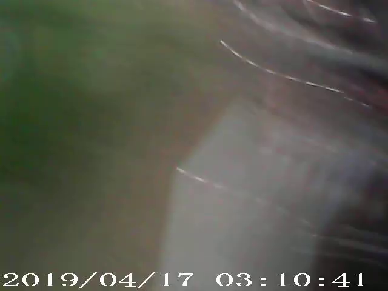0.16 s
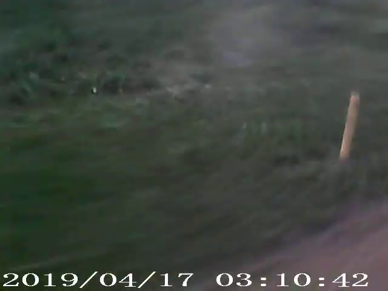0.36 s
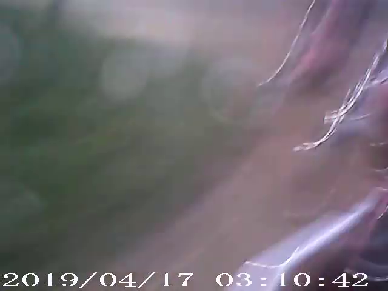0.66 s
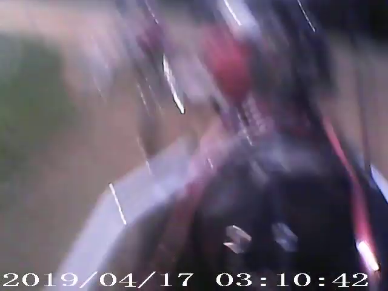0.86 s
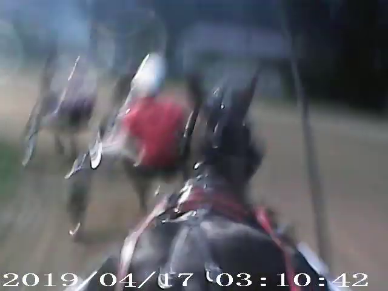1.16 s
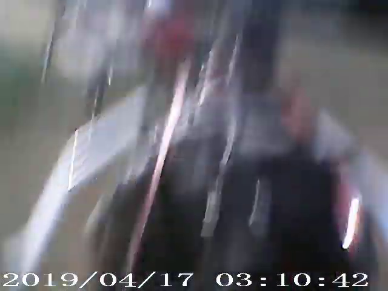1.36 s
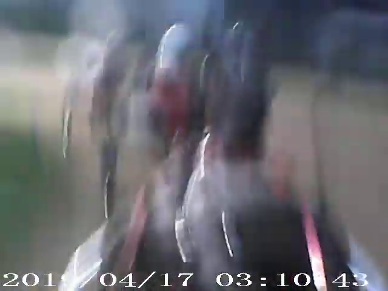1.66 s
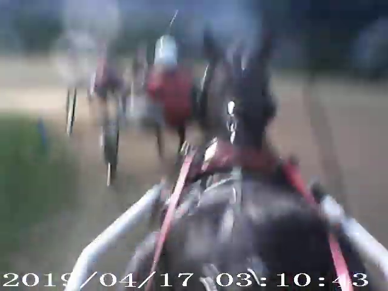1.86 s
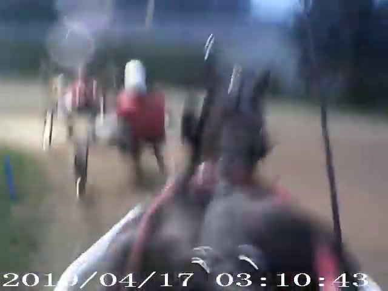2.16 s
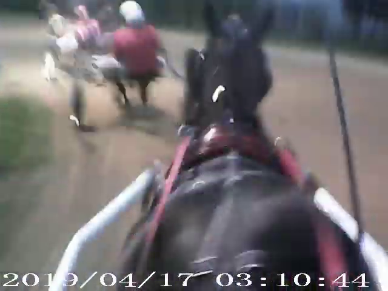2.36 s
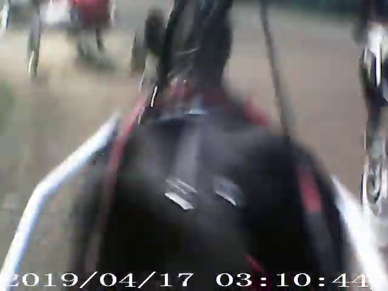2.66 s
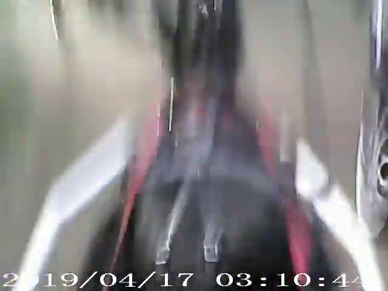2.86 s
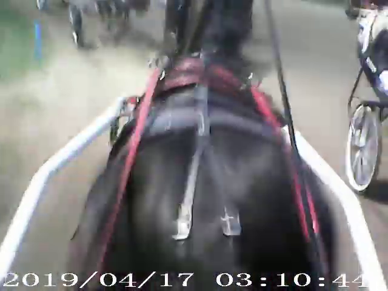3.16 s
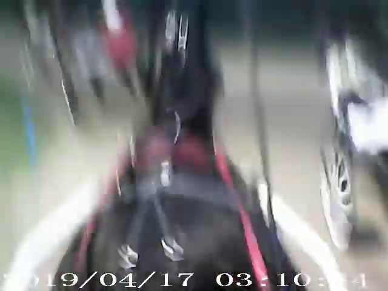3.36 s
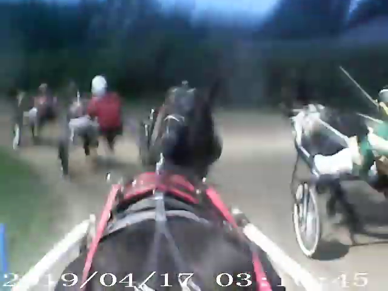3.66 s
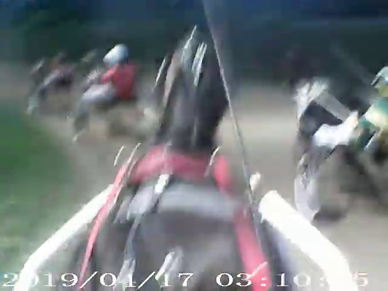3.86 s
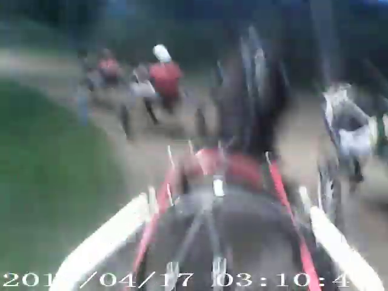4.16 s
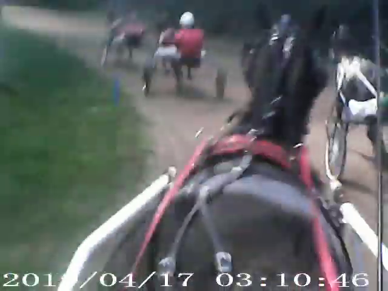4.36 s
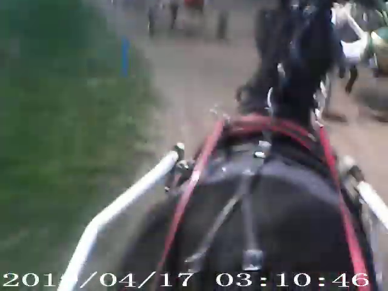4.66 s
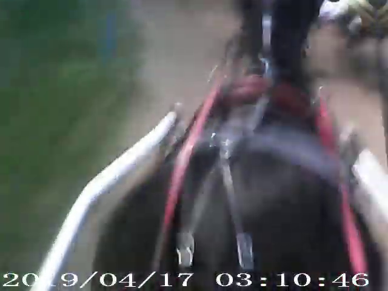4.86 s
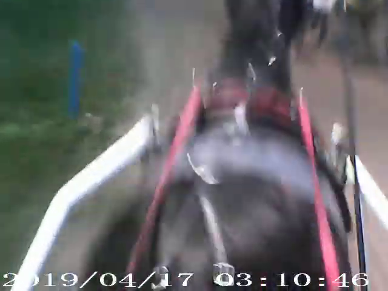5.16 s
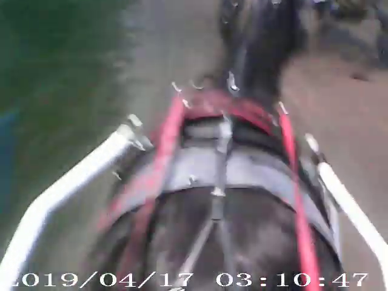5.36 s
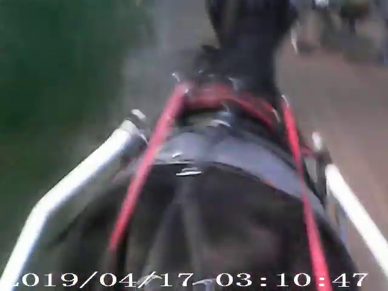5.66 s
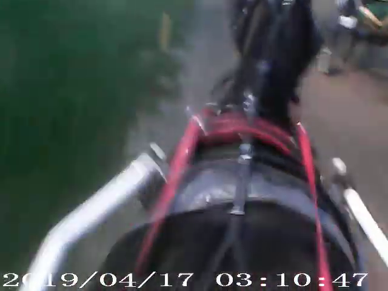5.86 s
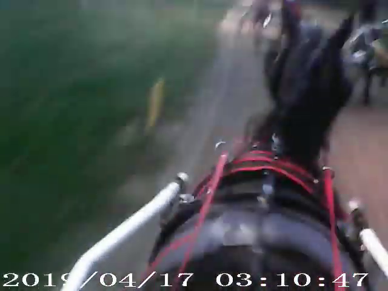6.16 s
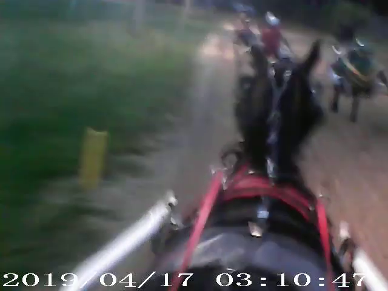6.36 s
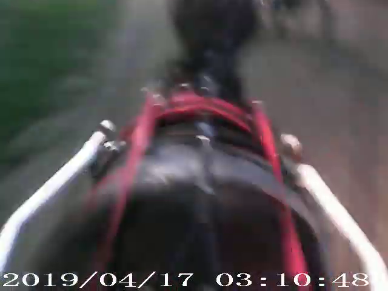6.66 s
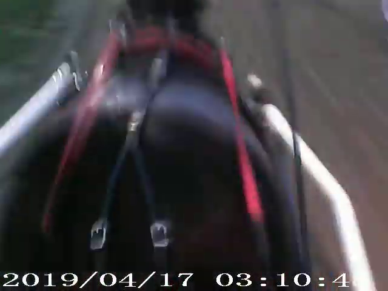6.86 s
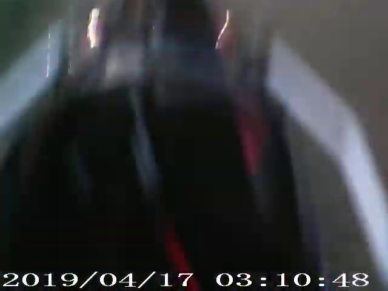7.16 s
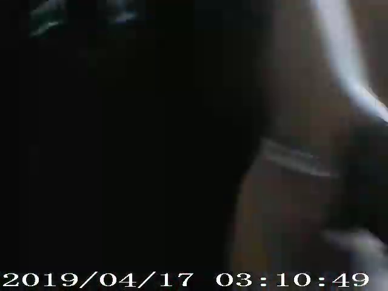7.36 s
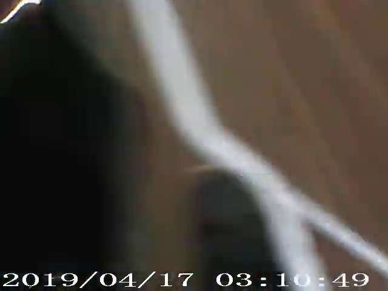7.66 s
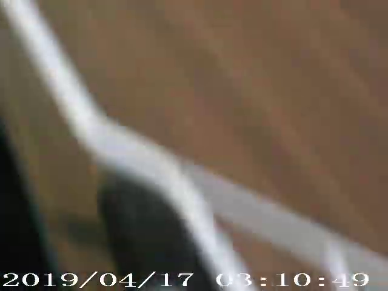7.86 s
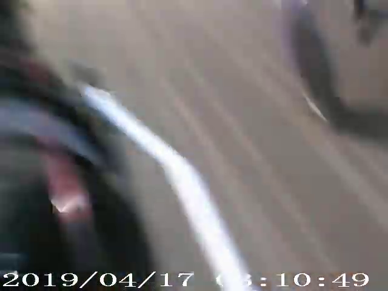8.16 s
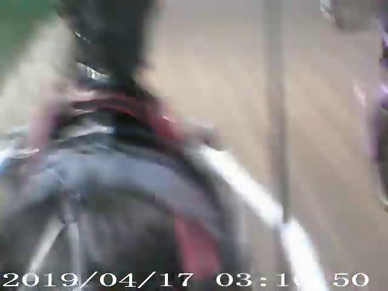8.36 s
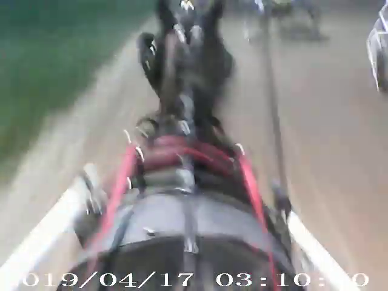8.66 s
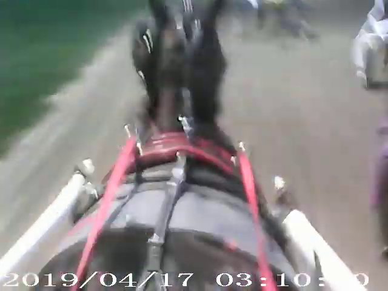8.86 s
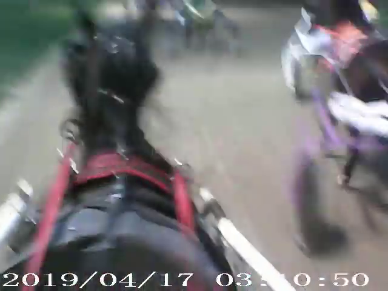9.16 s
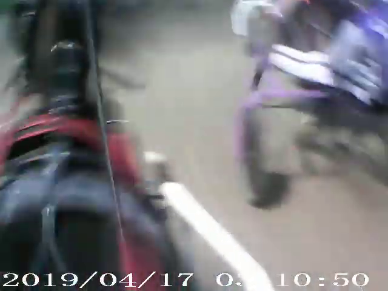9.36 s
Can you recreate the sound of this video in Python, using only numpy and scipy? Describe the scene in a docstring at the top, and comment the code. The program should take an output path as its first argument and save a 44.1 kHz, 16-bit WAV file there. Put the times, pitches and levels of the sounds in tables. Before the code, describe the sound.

Outdoors on a dirt track, a cart runs behind a horse. Heavy bumps and cracks of flying grit strike the microphone during the first two seconds, with a short metal clang almost immediately. Softer bumps cluster around three to five seconds, then mostly rolling sand, faint ticking and wind remain, broken by several late knocks. Mono, cheap, very close and without echo.

```python
"""Sulky on a dirt track

A sulky rolls fast behind a trotting horse, heard close up from a small camera that the driver wears.
The tyres hiss on crushed sand (shaped noise and grains); the headwind booms (resonant noise), and gusts
and jolts thump the microphone (short swings of pressure). Grit from the hooves raps on the housing (noise
bursts), loose fittings tick and the frame sings faintly. One stone rings a steel tube (decaying sines);
at a few moments the microphone chokes silent and snaps back with a spike."""
import sys
import numpy as np
from scipy import signal
from scipy.fft import rfft, irfft, next_fast_len
from scipy.io import wavfile
from scipy.ndimage import uniform_filter1d, map_coordinates

SR = 44100
rng = np.random.default_rng(int(sys.argv[2]) if len(sys.argv) > 2 else 0)


def log_audio(samples):
    """Write samples as a 16-bit WAV file to the path given in sys.argv[1]."""
    # one column per channel
    frames = np.atleast_2d(samples).T
    # limit to full scale, then quantise
    limited = np.clip(frames, -1, 1)
    pcm = np.round(limited * 32767).astype(np.int16)
    wavfile.write(sys.argv[1], SR, pcm)


N = 419832
TIME = np.arange(N) / SR  # seconds


def amp(db):
    """Decibels to gain."""
    return 10 ** (np.asarray(db) / 20)


def unit(x):
    """Scale to rms 1."""
    return x / np.sqrt(np.mean(x ** 2) + 1e-20)


def gain(points, hz):
    """Gain of (Hz, dB) points joined on a log frequency axis."""
    f, db = np.transpose(points)
    return amp(np.interp(np.log(hz + 1), np.log(f), db))


def curves(rows):
    """One value per sample for each column after the time."""
    s, *cols = np.transpose(rows)
    return [np.interp(TIME, s, c) for c in cols]


def wobble(rate):
    """A smooth random curve with rate knots a second."""
    knots = rng.standard_normal(2048)
    return map_coordinates(knots, [TIME * rate], mode="mirror")


def filtered(x, response):
    """Multiply the spectrum of x by a response of frequency."""
    size = next_fast_len(len(x) + len(x) // 10)
    f = np.fft.rfftfreq(size, 1 / SR)
    return irfft(rfft(x, size) * response(f), size)[:len(x)]


def add(track, s, sound):
    """Mix a sound into the track at time s."""
    start = max(round(s * SR), 0)
    track[start:start + len(sound)] += sound[:max(N - start, 0)]


def resonance(f, hz, width):
    """Causal response of one damped mode."""
    return 1j * f * width / (hz * hz - f * f + 1j * f * width)


def scattered(start, end, rate):
    """Uneven times in the span, about rate a second, falling freely within equal slots that overlap."""
    count = max(int(round((end - start) * rate)), 1)
    chance = rng.random(256)
    return start + (end - start) * (np.arange(count) + 2 * chance[:count]) / (count + 1)


# Headwind at the microphone. Each row: time in seconds, rumble level in dB.
WIND_RUMBLE = [(0, -45), (1.3, -37.5), (2.3, -47), (3.2, -53.5), (4.1, -42.5), (5.9, -48.5), (7.93, -45.5),
               (7.98, -39), (8.25, -44), (9.52, -44.5)]


def wind(hz=58, width_hz=40, sub_db=-9, sub_hz=30):
    """The headwind keeps up a lumpy boom around one low resonance, with a weaker one beneath it."""
    def response(f):
        main = np.abs(resonance(f, hz, width_hz)) ** 2
        sub = np.abs(resonance(f, sub_hz, sub_hz)) ** 2
        return main + amp(sub_db) * sub

    rumble_db, = curves(WIND_RUMBLE)
    boom = filtered(rng.standard_normal(N), response)
    lumps_db = 1.8 * wobble(12)
    return amp(rumble_db + lumps_db) * unit(boom)


# Spells in which the frame sings. Each row: middle in seconds, half length in seconds, level in dB.
SINGING_SPELLS = [(2.292, 0.25, -58.5), (5.8, 2.5, -63.5)]


def singing():
    """Vibration keeps one mode of the steel frame faintly singing, on and off."""
    mode = unit(filtered(rng.standard_normal(N), lambda f: resonance(f, 3323, 34)))
    spells = sum(amp(db) * np.exp(-((TIME - s) / length) ** 4) for s, length, db in SINGING_SPELLS)
    return amp(3.5 * wobble(14)) * spells * mode


def ticks(jolts, db=3, hz=2000):
    """Wherever the cart is being jolted, loose sand and harness fittings tick."""
    shaking = np.sqrt(np.abs(uniform_filter1d(jolts ** 2, size=SR // 16)))
    hits = rng.random(N) < 36 / SR  # about 36 a second
    contacts = hits * rng.uniform(-1, 1, N) * np.minimum(shaking, .05)
    t = np.arange(SR // 200) / SR
    scrape = rng.standard_normal(len(t)) * np.exp(-t / 0.00039)
    tapping = signal.fftconvolve(contacts, scrape)[:N]
    return amp(db) * filtered(tapping, lambda f: resonance(f, hz, 2 * hz))


# Air cavities right in front of the microphone. Each row: centre in Hz, width in Hz, lift or cut in dB.
HOUSING_CAVITIES = [(765, 98, 8.5), (1316, 300, 7), (1980, 370, 8), (3940, 120, 9), (4390, 260, 4.5),
                    (6400, 450, -3.5)]


def housing(f):
    """Each cavity in front of the microphone lifts or dips its own band."""
    bands = [1 + (amp(db) - 1) * resonance(f, hz, width) for hz, width, db in HOUSING_CAVITIES]
    return np.prod(bands, axis=0)


CRUMBS_PER_S, CRUMB_DB, CRUMB_HZ, CRUMB_S = 2, -28, 1200, .002  # rate, middle level and pitch, length


def crumbs(scatter_db=3):
    """Faint crumbs strike all along the way: rows like those of CLODS."""
    times = scattered(0, N / SR, CRUMBS_PER_S)
    chance = rng.uniform(-1, 1, (256, 2))
    return [(s, CRUMB_DB + scatter_db * force, CRUMB_HZ * 2 ** (pitch / 2), CRUMB_S)
            for s, (force, pitch) in zip(times, chance)]


# Clods that rap on the housing. Each row: start in seconds, level in dB, pitch in Hz, length in seconds.
CLODS = [(.033, 3.5, 2700, 0.003), (.04, 1, 1580, 0.0034), (.216, -6.5, 3820, 0.0038),
         (.3137, 0, 2140, 0.0043), (.4072, -5.5, 3800, 0.0062), (.451, -10.5, 3450, .0043),
         (.494, -9.5, 3750, 0.0021), (.51, -22, 3620, 0.0066), (.527, -3.5, 2360, 0.0038),
         (.752, -1.5, 3700, 0.00086), (1.039, -9, 3070, 0.0064), (1.101, -6.5, 3750, 0.0062),
         (1.1223, -4, 1150, 0.0066), (1.15, -7, 800, 0.0094), (1.371, -4, 2950, 0.0012),
         (2.119, -16, 1300, 0.0094), (2.544, -18.5, 1390, 0.0049), (2.964, -17, 1500, 0.0047),
         (3.027, -24, 3030, 0.0034), (3.144, -17, 1070, 0.0055), (3.738, -13, 1300, 0.00098),
         (3.957, -17.5, 1330, 0.011), (4.3965, -8, 4330, 0.003), (4.397, -16.5, 900, .012),
         (5.222, -16.5, 3150, 0.0088), (7.499, -6, 1550, 0.003), (7.739, -10.5, 1000, 0.0067),
         (7.744, -8, 3460, 0.0062), (7.9247, -12.5, 3670, 0.0031), (8.2735, -13, 3840, 0.0044),
         (8.646, -18, 2050, 0.0058)]
CLOD_WIDTH_HZ, CLOD_WIDENS = 5350, 0.85  # bandwidth of a low 0 dB rap; power of strength that widens it
SHELL_HZ, CLOD_SKIRT_DB = 3490, -7  # above this pitch the shell pings narrowly; broad crack in every rap


def grit(tail_db=-24, tail_t60=0.048, colour=0.81, briefness=0.7, usual_s=0.0049):
    """A clod bursts in milliseconds of micro-impacts, the harder and briefer the broader, with a tail."""
    out, t = np.zeros(N), np.arange(SR // 10) / SR
    for s, db, hz, length in list(CLODS) + crumbs():
        width = CLOD_WIDTH_HZ * amp(CLOD_WIDENS * db) * (usual_s / length) ** briefness
        width = width / np.hypot(1, (hz / SHELL_HZ) ** 4)
        burst = np.exp(-(t / length) ** 2)
        tail = amp(tail_db - 60 * t / tail_t60)
        spray = (1 - np.exp(-t / 0.00013)) * (burst + tail)

        def body(f):
            ping = resonance(f, hz, width)
            return ping * (ping + amp(CLOD_SKIRT_DB)) * housing(f) ** colour

        rap = filtered(spray * rng.standard_normal(len(t)), body)
        same_energy = np.linalg.norm(spray) / np.linalg.norm(rap)
        add(out, s, amp(db - 9.5) * rap * same_energy)
    return out


# Modes of the struck tube. Each row: pitch in Hz, relative level in dB, time to fall 60 dB in seconds.
TUBE_MODES = [(1494, -20, .3), (1620, 0, .08), (1902, -12, .6), (3259, -25, .3), (3322, -11, .1),
              (4400, -14, .08), (4480, -16, .1), (5798, -26, .22), (6400, -22, .26)]


def tube():
    """A stone rings a steel tube of the cart: its modes start together and die at their own rates."""
    out, t = np.zeros(N), np.arange(SR) / SR
    ring = sum(amp(level - 60 * t / t60) * np.sin(2 * np.pi * (hz * t + rng.random()))
               for hz, level, t60 in TUBE_MODES)
    onset = 1 - np.exp(-t / .001)
    add(out, .044, amp(-8) * ring * onset)
    return out


# Spells of buffeting air. Each row: start in seconds, end in seconds, typical level in dB.
BUFFETING_SPELLS = [(0.618, 0.877, -19), (1.099, 1.203, -15.5), (3.446, 4.248, -19), (4.727, 5.249, -24),
                    (6.296, 6.798, -22.5), (7.228, 7.37, -14.5)]
BUFFETS_PER_S, BUFFET_HZ, BUFFET_SCATTER_DB = 14, 159, 3.5  # rate, middle pitch, spread in strength


def buffets():
    """Lesser bumps come at random while the air buffets: rows like those of THUMPS."""
    times = [(s, db) for start, end, db in BUFFETING_SPELLS
             for s in scattered(start, end, BUFFETS_PER_S)]
    chance = rng.uniform(-1, 1, (256, 2))
    return [(s, db + BUFFET_SCATTER_DB * force, BUFFET_HZ * 2 ** (pitch / 2))
            for (s, db), (force, pitch) in zip(times, chance)]


# Gusts and jolts that thump the microphone. Each row: middle in seconds, level in dB, pitch in Hz.
THUMPS = [(.047, 2.5, 290), (.224, -12, 190), (.271, -10, 185), (.286, -3, 235), (.308, -2.5, 414),
          (.389, -7.5, 224), (.688, -13, 253), (.926, -9, 182), (1.154, -3.5, 365), (1.173, 0, 300),
          (1.352, -0.5, 192), (1.493, 1, 490), (1.606, -0.5, 196), (1.681, -11, 260), (1.769, -10.5, 130),
          (1.79, -7, 290), (2.559, -10.5, 165), (2.61, -11, 211), (2.976, -5.5, 255), (3.036, -7.5, 190),
          (3.053, -5, 280), (3.433, -14.5, 176.3), (3.478, -9, 244), (3.54, -13.5, 180),
          (3.606, -12.5, 203), (3.655, -11.5, 155), (3.728, -3.5, 222), (3.904, -5.5, 204),
          (4.088, -7.5, 204), (4.128, -8, 201), (4.192, -16, 145), (4.277, -10.5, 131), (4.803, -15.5, 178),
          (4.998, -11.5, 179), (5.112, -13, 126), (5.156, -13, 170), (5.378, -17, 197), (5.443, -12, 181),
          (5.535, -10.5, 182), (6.013, -19.5, 187), (6.193, -18, 227), (6.488, -21, 154),
          (7.176, -8.5, 223), (7.324, -17.5, 260), (7.5, -9.5, 463), (7.741, -16, 520), (8.617, -12.5, 188)]


def bumps(cycles=0.6, shortest=0.0025, push=0.55, push_width=1.035, bend=0.077,
          scuff_db=-21, scuff_hz=550, scuff_life=0.0052, eddy_db=-14, eddy_lag=0.01572):
    """A bump is a swing or two of pressure on a slower push, with scuffing and a weaker eddy close by."""
    out, t = np.zeros(N), np.arange(-SR // 20, SR // 20) / SR
    for s, db, hz in list(THUMPS) + buffets():
        phase, glide, side, lag = rng.uniform(-1, 1, 4)
        length = max(cycles / hz, shortest)  # high bumps swing several times and sound like knocks
        bluntness = cycles / hz / length
        u = t / length
        swell = 1 / np.cosh(np.clip(2.98 * u, -20, 20))
        bent_time = t * (1 + bend * glide * np.tanh(u))  # the pitch bends a little
        swing = np.sqrt(bluntness) * swell * np.cos(2 * np.pi * hz * bent_time + np.pi * phase)

        push_swell = np.exp(-(u / push_width) ** 2 / 2)
        slow = push * bluntness ** 2 * np.sin(np.pi * side + 1.57 * u / push_width) * push_swell

        rubbing = np.where(t < 0, swell, np.exp(-np.abs(t) / scuff_life))
        rasp = filtered(rng.standard_normal(len(t)),
                        lambda f: resonance(f, scuff_hz, 1.32 * scuff_hz) ** 2)
        scuff = rubbing * unit(rasp)

        add(out, s + t[0], amp(db) * (swing + slow + amp(scuff_db) * scuff))
        add(out, s + t[0] + eddy_lag * np.cbrt(lag), amp(db + eddy_db) * swing)  # before or after
    return out


def patchy(x, depth_db):
    """Let each band of x swell and sink by itself."""
    z = signal.stft(x, nperseg=512)[2]
    field = uniform_filter1d(rng.standard_normal(z.shape), size=7, axis=0)
    field = uniform_filter1d(field, size=9, axis=1)
    return signal.istft(z * amp(depth_db * unit(field)), nperseg=512)[1][:N]


def crunch(spectrum, rate, grain_db, patchy_db, spread_db=4):
    """A bed of countless tiny grains with rate larger ones a second on top, rms 1."""
    hits = (rng.random(N) < rate / SR) * rng.choice([-1, 1], N)
    grains = hits * amp(spread_db * np.minimum(rng.exponential(size=N), 2))
    bed = rng.standard_normal(N) + amp(grain_db) * unit(grains)
    return unit(filtered(patchy(bed, patchy_db), lambda f: gain(spectrum, f) * housing(f)))


# Spectra of the wheels' and hooves' drone, of the roll and of the sand's hiss, before the housing
# colours them. Each row: frequency in Hz, relative level in dB per Hz.
DRONE_SPECTRUM = [(25, -11.5), (110, 3.5), (220, 3), (500, 4), (800, -8.5), (1150, -19.5), (2200, -37.5)]
ROLL_SPECTRUM = [(200, -7.5), (900, -5), (1400, -4), (1800, -7.5), (2200, -6.5), (2700, -16.5), (4000, -37)]
HISS_SPECTRUM = [(1200, -22), (2300, -5.5), (3100, 2), (4100, -1), (5000, -5.5), (7000, -5), (8000, -25.5)]
# How hard the tyres crush the track. Each row: time in seconds, roll level in dB.
ROLL_LEVEL = [(0, -35.5), (.55, -42), (.98, -41), (1.06, -33.5), (1.7, -42), (2.8, -45), (3.6, -45.5),
              (3.85, -40.5), (4.35, -38), (4.52, -45.5), (5.05, -45.5), (5.2, -40.5), (5.62, -37),
              (5.8, -45.5), (7.7, -42.5), (7.8, -39), (8.2, -42.5), (9.52, -39)]
# The sand's hiss against the roll's mean level. Each row: time in seconds, level in dB.
HISS_LEVEL = [(0, -7.5), (1.45, -5), (1.7, -8), (9.52, -9)]
DRONE_DB = -1  # drone relative to the roll
HISS_GROWS = 0.86  # dB of hiss for each dB of roll


def tyres():
    """Tyres and hooves crush the sand; rolling level and uneven ground drive drone, roll and hiss."""
    roll_db, = curves(ROLL_LEVEL)
    treble_db, = curves(HISS_LEVEL)
    hiss_db = roll_db.mean() + HISS_GROWS * (roll_db - roll_db.mean()) + treble_db
    ground_db = 1.1 * wobble(26)
    drone_gain = amp(roll_db + DRONE_DB + ground_db)
    roll_gain = amp(roll_db + ground_db + 1.72 * wobble(70))
    hiss_gain = amp(hiss_db + ground_db + 2.0 * wobble(60))
    drone = drone_gain * crunch(DRONE_SPECTRUM, rate=120, grain_db=-4.5, patchy_db=2)
    roll = roll_gain * crunch(ROLL_SPECTRUM, rate=220, grain_db=-9.5, patchy_db=1.5)
    hiss = hiss_gain * crunch(HISS_SPECTRUM, rate=150, grain_db=-4.5, patchy_db=2.2)
    return drone + roll + hiss


def rounded(x):
    """The microphone rounds off the largest swings of pressure."""
    return x / (1 + (x / .68) ** 4) ** .25


# Moments at which the microphone chokes. Each row: end of the choke in seconds, spike level in dB,
# choked time in seconds.
CHOKES = [(.054, -9.5, .0046), (.2866, -26, 0.0057), (.736, -4, 0.0064), (1.1317, -3.5, 0.0056),
          (1.164, -5, 0.0059), (2.975, -20.5, 0.00725), (4.993, -4.5, 0.005)]


def choked_microphone(x, relax=0.0011):
    """At a few moments the microphone chokes silent and snaps back with a two-sided spike."""
    flip = .0009  # seconds from the start of the spike to its change of sign
    out, passing, t = np.zeros(N), np.ones(N), np.arange(SR // 50) / SR
    for s, db, choked in CHOKES:
        passing = passing * ((TIME < s - choked) | (TIME > s))
        spike = np.where(t < flip, (t / flip) ** 2, -np.exp(-(t - flip) / relax))
        add(out, s - flip, amp(db) * spike)
    return x * uniform_filter1d(passing, size=24) + out


def scene():
    """Everything as it reaches the one microphone on the driver."""
    jolts = rounded(bumps())
    background = wind() + singing() + ticks(jolts)
    strikes = grit() + tube() + jolts
    return choked_microphone(background + strikes + tyres())[None]


# Band limit of the small camera. Each row: frequency in Hz, gain in dB.
CAMERA_BAND = [(6700, 0.5), (7100, -9), (7450, -24.5), (8500, -42), (10000, -61.5)]
TOP_HZ = 16800  # nothing passes from here up


def record(dry):
    """The small camera keeps little above 7 kHz, and the hardest peaks clip."""
    ceiling = .72
    banded = filtered(dry[0], lambda f: gain(CAMERA_BAND, f))
    clipped = np.clip(banded, -ceiling, ceiling)
    return filtered(clipped, lambda f: f < TOP_HZ)[None]


dry = scene()
out = record(dry)
log_audio(out)
```